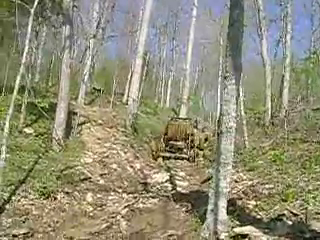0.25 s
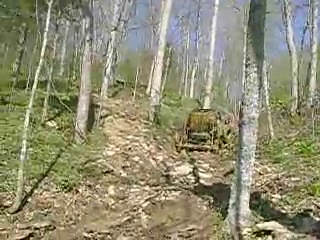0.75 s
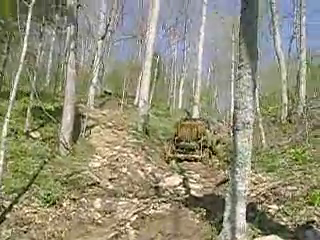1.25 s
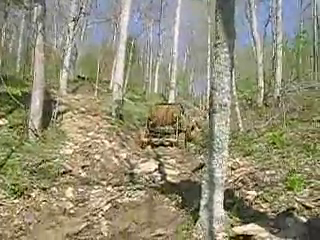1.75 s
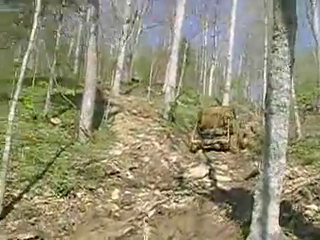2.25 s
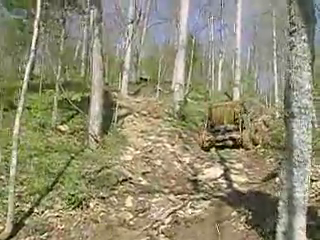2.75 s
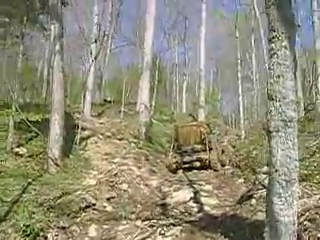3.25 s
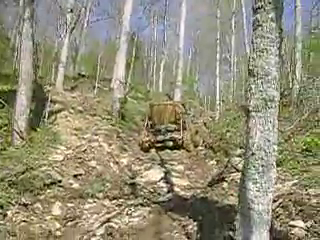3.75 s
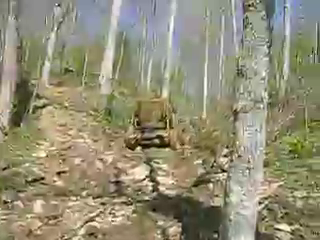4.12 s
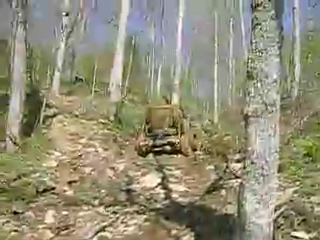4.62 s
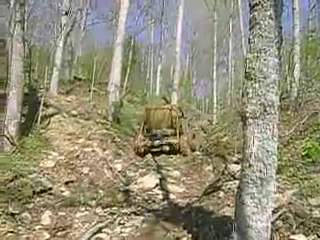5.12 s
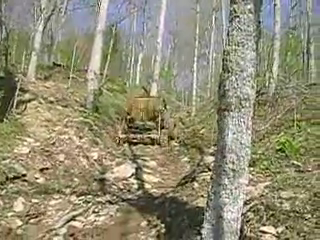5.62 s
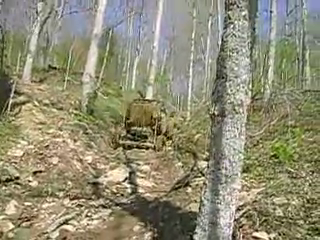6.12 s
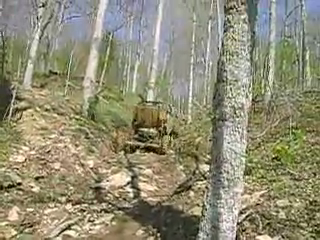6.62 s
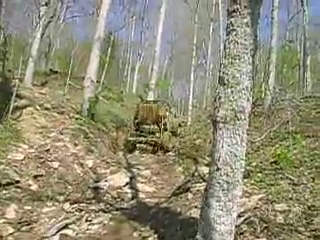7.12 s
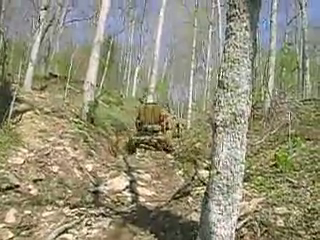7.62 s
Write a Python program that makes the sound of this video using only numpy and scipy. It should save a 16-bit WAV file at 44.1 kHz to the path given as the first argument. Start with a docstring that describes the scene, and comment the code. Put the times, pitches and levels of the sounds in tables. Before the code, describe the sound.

A small buggy engine on a rocky forest slope winds down from a throaty burble to a slow lumpy chug, with stones knocking the chassis. A blip brings crackling exhaust pops and a short surge, which sags again. After more labouring it barks harder, the belt chirps, and the revs climb in steps to a loud raw howl. Outdoors, faint tree echoes, small narrow-band microphone buzzing with overload.

```python
"""On a rocky forest slope a small off-road buggy crawls uphill: it sags, is blipped, labours, then is revved out.
The exhaust booms as six firing orders through a silencer and barks as pulses and gas noise ringing the pipe.
Throbbing noise makes the gas rush, ringing bursts the stone knocks and pops, a wavering sine the belt squeal.
Wide open, a howl of sharp pulses joins in; loud sound overloads a small microphone towards a buzzing square wave."""
import sys
import numpy as np
from scipy import signal
from scipy.fft import rfft, irfft, next_fast_len
from scipy.io import wavfile
from scipy.ndimage import uniform_filter1d

SR = 44100
rng = np.random.default_rng(int(sys.argv[2]) if len(sys.argv) > 2 else 0)


def pcm_store(signal):
    """Save signal as 16-bit PCM."""
    levels = np.round(np.clip(np.atleast_2d(signal), -1, 1) * 32767)
    wavfile.write(sys.argv[1], SR, levels.astype(np.int16).T)


N = 347049
TIME = np.arange(N) / SR

# exhaust pipe resonances: (frequency [Hz], width [Hz], relative level [dB])
PIPE = [(405.5, 24.5, 3.5), (468.7, 33.8, 3), (687, 43, -14.5), (1037, 53, -18), (1277, 85, -10.5),
        (1738, 59, -18.5)]


def from_db(db):
    """Decibels to gain."""
    return 10 ** (np.asarray(db) / 20)


def rms_one(x):
    """Scale to unit power."""
    return x / np.sqrt(np.mean(x ** 2) + 1e-20)


def in_time(rows):
    """Draw each column of a breakpoint curve as straight lines over every sample."""
    times, *columns = np.transpose(rows)
    return [np.interp(TIME, times, column) for column in columns]


def drift(rate_hz):
    """Slow random wander of spread 1: noise through two equal low-pass poles at rate_hz."""
    step = 40   # samples between the points of the wander
    pole = np.exp(-2 * np.pi * rate_hz * step / SR)
    settle = 2000   # points dropped while the filter settles
    noise = rng.standard_normal(N // step + 2 + settle)
    slow = signal.lfilter([1], [1, -2 * pole, pole * pole], noise)[settle:]
    return np.interp(np.arange(N) / step, np.arange(len(slow)), rms_one(slow))


def coloured_noise(spectrum):
    """Noise of unit power, its spectrum drawn over log frequency."""
    hz, db = np.transpose(spectrum)
    size = next_fast_len(N)
    bins = np.maximum(np.fft.rfftfreq(size, 1 / SR), 1)
    gain = from_db(np.interp(np.log(bins), np.log(hz), db))
    return rms_one(irfft(rfft(rng.standard_normal(size)) * gain, size)[:N])


def resonate(x, hz, width_hz):
    """One two-pole resonance, about gain 1 on top."""
    r = np.exp(-np.pi * width_hz / SR)
    feedback = [1, -2 * r * np.cos(2 * np.pi * hz / SR), r * r]
    return signal.lfilter(np.array([1, 0, -1]) * (1 - r * r) / 2, feedback, x + 1e-18)


def firings(turns, unevenness_db):
    """One click a firing cycle, placed between samples, each of its own random strength."""
    at = np.interp(np.arange(1, int(turns[-1])), turns, np.arange(N))
    strength = from_db(unevenness_db * rng.standard_normal(2000))[:len(at)]
    whole = at.astype(int)
    part = at % 1
    early = np.bincount(whole, strength * (1 - part), N + 1)
    late = np.bincount(whole + 1, strength * part, N + 1)
    return (early + late)[:N]


def evened(x):
    """Drop the bass below 300 Hz and hold the running power near 1."""
    x = signal.sosfilt(signal.butter(2, 300, "high", fs=SR, output="sos"), x)
    return x / np.sqrt(uniform_filter1d(x ** 2, size=4001) + 1e-9)


def boom(turns, speed, level_db, bite_db, flutter_db, wobble_rad, smear_rad):
    """Six firing orders, near sines, slide through the silencer's response; bite tilts them to the top."""
    # response of the silencer: (frequency [Hz], gain [dB])
    silencer = [(30, -15.5), (50, -3.5), (68, -9), (90, 10.5), (115, 3), (145, -11), (180, -9.5),
                (210, -14.5), (250, -24.5), (350, -36), (600, -53), (1300, -52)]
    hz, db = np.transpose(silencer)
    shared_db = level_db + flutter_db * drift(12)
    # at low revs the silencer rings on and smears each pulse over its cycle
    ringing = np.clip((92 - speed) / 20, 0, 1)
    out = np.zeros(N)
    for order in range(1, 7):
        octaves = np.log2(order * speed / 100)   # from 100 Hz
        response_db = np.interp(octaves, np.log2(hz / 100), db)
        gain = from_db(shared_db + bite_db * octaves + response_db)
        smear = smear_rad * ringing * order * (order - 2)
        phase = 2 * np.pi * order * turns + smear + wobble_rad * drift(5.5)
        out += np.sqrt(2) * gain * np.cos(phase)
    return out


def bark(turns, revs, unevenness_db, rough_slow, rough_fast):
    """Each firing sends a pulse and a puff of gas down the ringing pipe; it is cleaner at high revs."""
    puffs = rng.standard_normal(N) * np.exp(-1.5 * (turns % 1))
    roughness = rough_slow + (rough_fast - rough_slow) * revs
    drive = rms_one(firings(turns, unevenness_db)) + roughness * rms_one(puffs)
    out = np.zeros(N)
    for k, (hz, width_hz, db) in enumerate(PIPE):
        out += (-1) ** k * from_db(db) * resonate(drive, hz, width_hz)   # neighbours in opposite phase
    return evened(out)


def rasp(turns, throb, lag_turns, flicker_db):
    """Gas rush and mechanical clatter: noise that swells once in every firing cycle."""
    # colour of the rush and clatter: (frequency [Hz], relative level [dB per Hz])
    rasp_colour = [(40, -2), (90, -5.5), (200, 5), (330, -1), (470, 5), (600, 0.5), (900, 4), (1300, 1),
                   (2200, -8.5), (3200, -10), (5000, -10), (6500, -36)]
    swell = np.exp(throb * np.cos(2 * np.pi * (turns - lag_turns)))
    gate = swell / np.sqrt(np.i0(2 * throb))   # a deeper throb keeps the same mean power
    return coloured_noise(rasp_colour) * gate * from_db(flicker_db * drift(21))


def rumble(octaves):
    """The running machine rumbles on the slope: low noise that grows with engine speed."""
    # colour of the rumble: (frequency [Hz], relative level [dB per Hz])
    rumble_colour = [(20, -21), (50, -13.5), (90, 3.5), (140, -4), (250, -13.5), (600, -28), (2000, -58)]
    return from_db(-30 + 4 * octaves) * coloured_noise(rumble_colour)


def forest(x, dull_hz):
    """A few dull echoes come back from the slope and the trunks."""
    # echoes: (delay [s], level [dB])
    echoes = [(0.011, -10), (0.032, -23), (.058, -25), (0.099, -31.5)]
    dull = signal.sosfilt(signal.butter(1, dull_hz, fs=SR, output="sos"), x)
    return x + sum(from_db(db) * np.interp(TIME - delay, TIME, dull, left=0) for delay, db in echoes)


def knocks():
    """Chassis and wheels hit stones: short gritty contacts ring the chassis."""
    # contacts: (time [s], level [dB], decay to 1/e [s])
    contacts = [(0.112, -28.5, 0.031), (0.829, -36, 0.021), (1.813, -28.5, 0.01), (2.677, -25, 0.0043),
                (3.089, -30.5, .02), (3.495, -25.5, 0.046), (3.53, -34, 0.044), (3.698, -30, 0.025),
                (3.84, -29.5, 0.022), (4.299, -30.5, 0.011)]
    # what the chassis rings with: (frequency [Hz], width [Hz], relative level [dB])
    chassis = [(690, 120, 10), (917, 30, 15), (1450, 670, 0.5), (2830, 880, -10), (4580, 900, -35)]
    force = np.zeros(N)
    for start, db, decay in contacts:
        fall = np.exp(-np.clip((TIME - start) / decay, 0, 20))
        force += from_db(db) * (TIME >= start) * fall
    grit = rng.standard_normal(N)
    ring = sum(from_db(db) * resonate(grit, hz, width_hz) for hz, width_hz, db in chassis)
    return force * rms_one(ring)


def pops():
    """Late firings crack in the pipe as ringing noise and thump the silencer for a few swings."""
    # exhaust pops: (time [s], thump level [dB], crack level [dB])
    late_firings = [(2.179, -10.5, -37), (2.245, -5, -29.5), (2.281, -3, -21.5), (2.31, -3, -17),
                    (2.337, -13, -10.5), (2.364, -15.5, -9.5), (2.388, -14.5, -9.5), (4.027, -10, -41),
                    (4.061, -3, -30.5)]
    thump_hz, thump_t60_s, crack_t60_s = 90, 0.069, 0.088
    gas = rng.standard_normal(N)
    crack = rms_one(sum(resonate(gas, hz, width_hz) for hz, width_hz, _ in PIPE))
    out = np.zeros(N)
    for start, thump_db, crack_db in late_firings:
        age = np.maximum(TIME - start, 0)
        thump_gain = from_db(thump_db - 60 * np.minimum(age / thump_t60_s, 2))
        crack_gain = from_db(crack_db - 60 * np.minimum(age / crack_t60_s, 2))
        out -= thump_gain * np.sin(2 * np.pi * thump_hz * age)
        out += crack_gain * crack * (age > 0)
    return out


def howl(turns, lead_turns, unevenness_db):
    """Wide open, a sharp pulse about half a cycle from the firing clicks rings a few broad resonances."""
    # broad resonances: (frequency [Hz], width [Hz], relative level [dB])
    howl_modes = [(624, 338, 2.5), (961, 280, 2.5), (1150, 260, -7.5)]
    drive = -rms_one(firings(turns + lead_turns, unevenness_db))
    return evened(sum(from_db(db) * resonate(drive, hz, width_hz) for hz, width_hz, db in howl_modes))


def belt(waver):
    """The slipping drive belt squeals: one sine with an unsteady pitch."""
    # squeal: (time [s], frequency [Hz], level [dB])
    squeal = [(5.64, 1701, -70), (5.67, 1670, -15), (5.73, 1599, -11.5), (5.8, 1640, -13.5),
              (5.9, 1625, -17), (5.96, 1620, -64)]
    hz, db = in_time(squeal)
    turns = np.cumsum(hz * (1 + waver * drift(60))) / SR
    return np.sqrt(2) * from_db(db) * np.sin(2 * np.pi * turns)


def limp(turns, speed, from_hz, level_db):
    """Uneven pairs of firings: above a set speed a tone enters an octave below the firing rate."""
    return from_db(level_db) * (speed > from_hz) * np.cos(np.pi * turns)


def scene():
    """Engine speed times the exhaust layers; load and harsh firings bring out bite, bark and gas rush."""
    # engine speed: (time [s], firing rate [Hz])
    speed_curve = [(0.0, 63.9), (0.08, 62.2), (0.39, 46.3), (0.92, 39.2), (1.4, 32.5), (2.01, 29.9),
                   (2.23, 28.0), (2.26, 29.1), (2.35, 42.3), (2.39, 48.8), (2.45, 57.6), (2.52, 66.2),
                   (2.67, 71.7), (2.8, 69.3), (3.29, 59.0), (3.66, 47.1), (3.77, 56.9), (4.01, 61.1),
                   (4.82, 53.8), (5.35, 62.2), (5.48, 57.9), (5.68, 78.5), (5.87, 82.2), (6.11, 115.8),
                   (6.31, 116.2), (6.42, 121.0), (6.53, 111.6), (6.75, 144.3), (7.15, 184.6), (7.45, 195.1),
                   (7.58, 214.0), (7.87, 210.1)]
    # effort above a steady crawl: (time [s], load [dB], harshness of the firings [dB])
    effort_curve = [(0.0, 4, -0.5), (0.12, -1.5, 3.5), (0.33, 3, 1.5), (0.47, -7, 2), (0.9, -8, 2),
                    (1.35, 1, -1), (1.85, -7.5, 3), (2.25, 3.5, 8), (2.33, 11.5, 7.5), (2.39, 7.5, 15.5),
                    (2.48, 8, 3), (2.63, 0, -2), (3.42, -2, 2.5), (3.53, 2, 4.5), (3.9, -1, 2),
                    (4.75, -1.5, -0.5), (5.08, 0, 1.5), (5.25, 7, 3), (5.39, 12, 2), (5.48, 14.5, 8.5),
                    (5.66, 7, 9), (5.87, 2.5, 20), (6.08, -4, 20), (6.2, -2.5, 11), (6.34, 4.5, 6),
                    (6.46, 1, 14.5), (6.58, 3, 7), (6.78, 2.5, 4.5), (7.2, 2, 1), (7.7, -0.5, 2.5),
                    (7.87, 4, 1.5)]
    # howl with the throttle wide open: (time [s], level against the boom's level curve [dB])
    howl_curve = [(5.3, -50), (5.6, -21), (6.05, -9), (6.3, -22), (6.56, -13), (6.66, -15), (6.92, -8),
                  (7.12, -18), (7.42, -22), (7.55, -16), (7.87, -13)]
    speed, = in_time(speed_curve)
    load_db, harsh_db = in_time(effort_curve)
    howl_db, = in_time(howl_curve)

    turns = np.cumsum(speed * (1 + 0.0014 * drift(19.1))) / SR   # firing cycles so far
    revs = np.clip((speed - 60) / 90, 0, 1)   # 0 crawling, 1 from 150 firings per second
    octaves = np.log2(speed / 60)   # doublings from crawling speed
    climb = np.clip(np.gradient(octaves) * SR, -1, 1)
    pull = uniform_filter1d(climb, size=4001)   # doublings a second: positive picking up, negative on the overrun

    # levels: dB at a crawl, dB per doubling of speed, then shares of load, harshness and pull
    boom_db = -15 + 19 * octaves + load_db
    bark_db = -29.5 + 14 * octaves + 0.5 * load_db + 0.79 * harsh_db + 2 * pull
    rush_db = -35 + 17.5 * octaves + load_db + 1.047 * harsh_db
    clatter_db = -40 + harsh_db   # independent of speed, so it stays down to idle
    bite_db = -0.5 + 0.76 * harsh_db + 1.6 * pull   # tilt of the boom, dB per octave
    # flat out the bark gives way to the howl: 50 dB lost per doubling above 120.86 firings per second
    fade_db = 50 * np.maximum(np.log2(speed / 120.86), 0)
    throb = 0.11 + 0.017 * np.maximum(harsh_db, 0)   # harsh firings deepen the throb of the gas rush

    low = boom(turns, speed, boom_db, bite_db, flutter_db=1.4, wobble_rad=0.1, smear_rad=0.873)
    pipe = from_db(bark_db - fade_db) * bark(turns, revs, unevenness_db=1.0, rough_slow=1.0, rough_fast=0.067)
    rush_gain = np.hypot(from_db(rush_db), from_db(clatter_db))
    rush = rush_gain * rasp(turns, throb, lag_turns=0.52, flicker_db=0.9)
    brass = from_db(boom_db + howl_db) * howl(turns, lead_turns=0.48, unevenness_db=2.3)
    uneven = from_db(boom_db) * limp(turns, speed, from_hz=209, level_db=-28.5)
    echoed = forest(pipe + rush + knocks() + belt(waver=0.02), dull_hz=3020)
    return (low + rumble(octaves) + echoed + pops() + brass + uneven)[None]


def overload(x, limit, order):
    """Nearly straight up to the limit, flat beyond it; a higher order bends more sharply."""
    return x / (1 + np.abs(x / limit) ** order) ** (1 / order)


def record(dry):
    """The narrow-band microphone overloads; some distortion leaks above the band, and peaks flatten again."""
    band = signal.cheby1(8, 0.3, 5690, fs=SR, output="sos")
    above_band = signal.butter(6, 6500, "high", fs=SR, output="sos")
    top_cut = signal.cheby2(16, 70, 16800, fs=SR, output="sos")   # 70 dB down from 16.8 kHz
    clipped = overload(signal.sosfilt(band, dry), limit=0.7, order=10)
    fizz = from_db(-31.5) * resonate(signal.sosfilt(above_band, clipped), 12000, 3500)
    flattened = overload(signal.sosfilt(band, clipped), limit=0.68, order=30)
    return signal.sosfilt(top_cut, flattened + fizz)


dry = scene()
out = record(dry)
pcm_store(out)
```